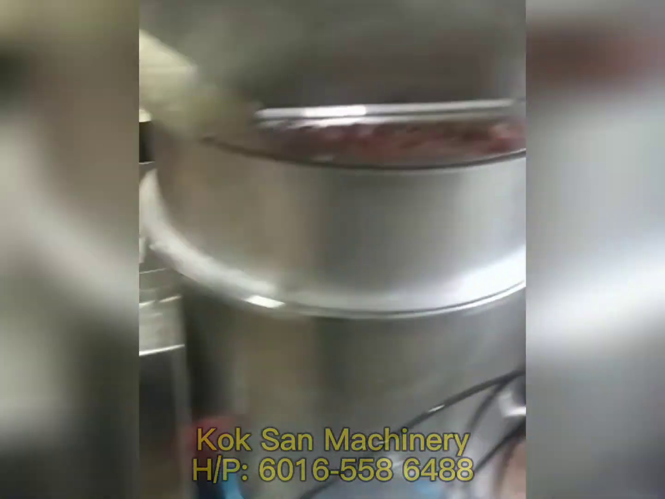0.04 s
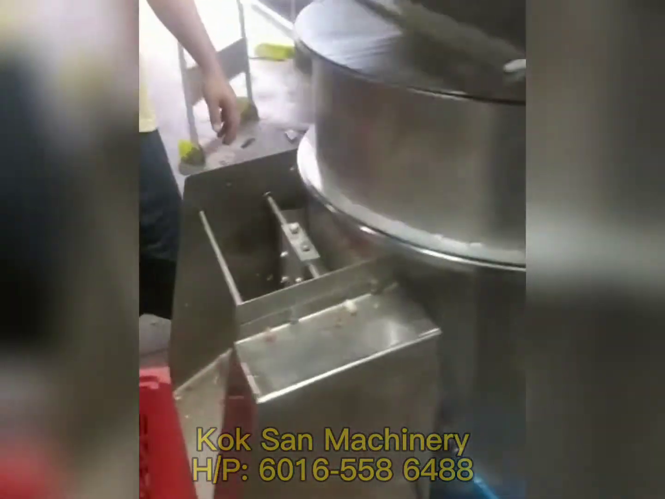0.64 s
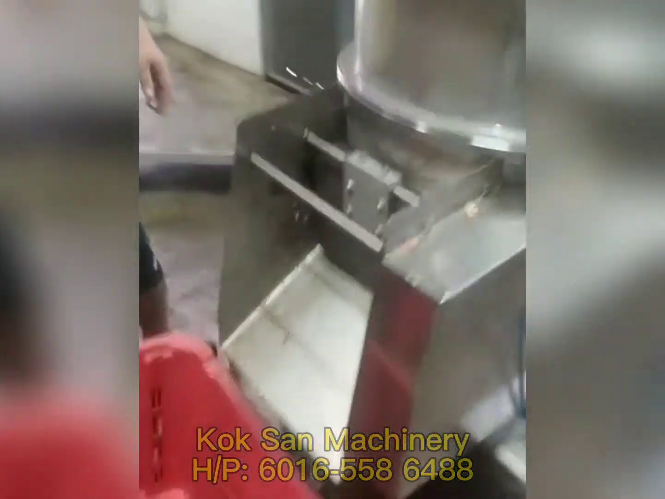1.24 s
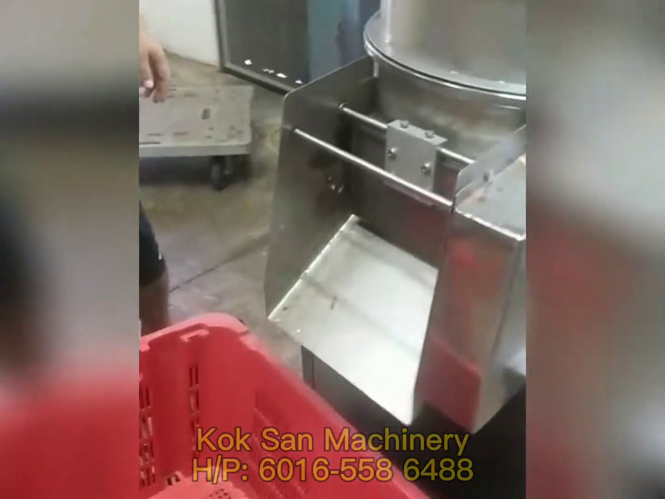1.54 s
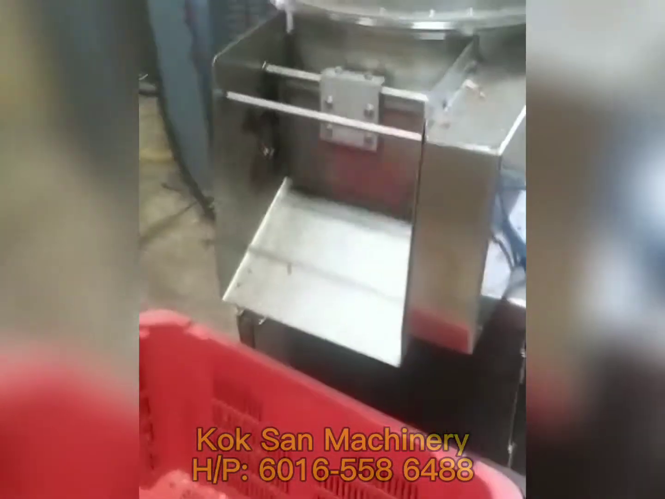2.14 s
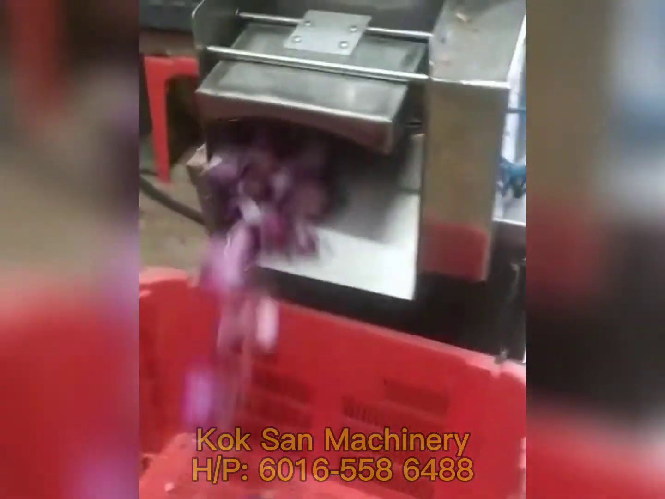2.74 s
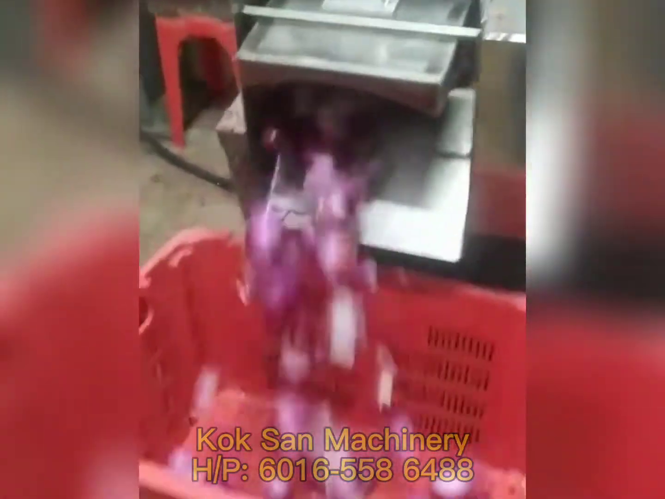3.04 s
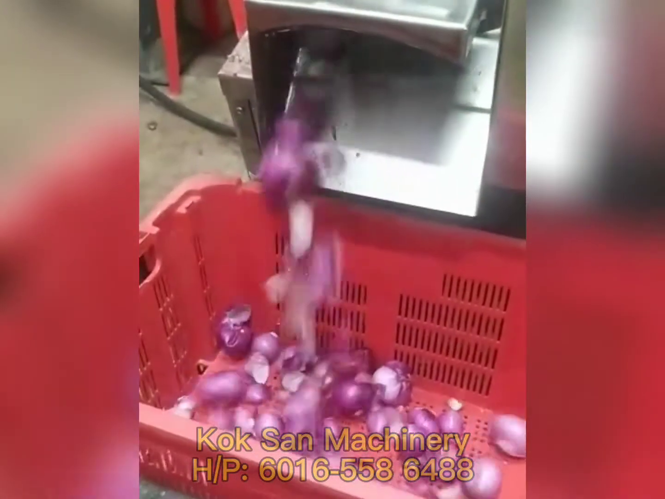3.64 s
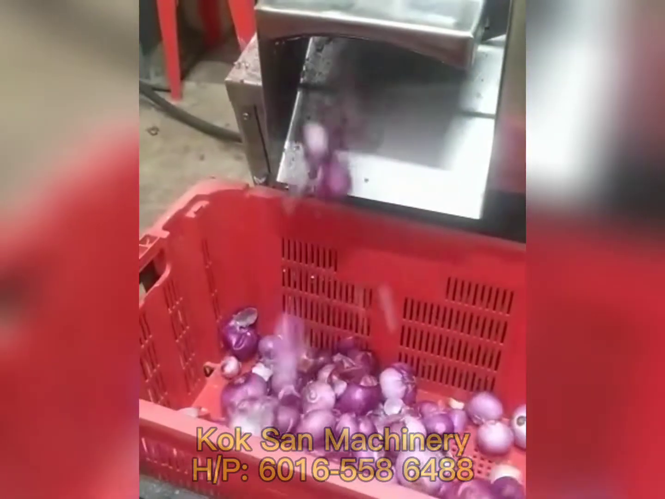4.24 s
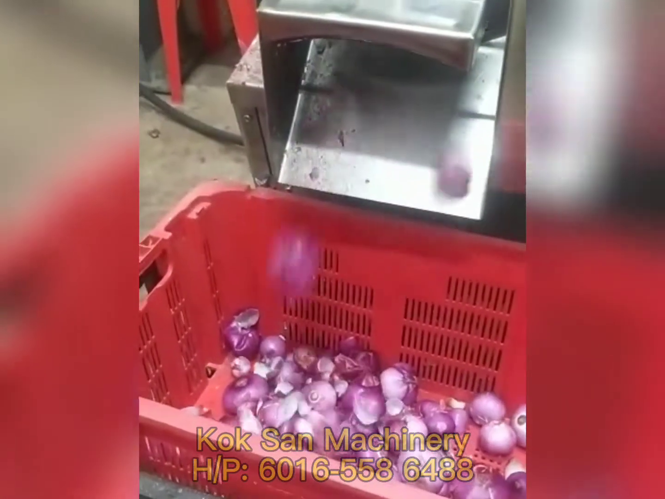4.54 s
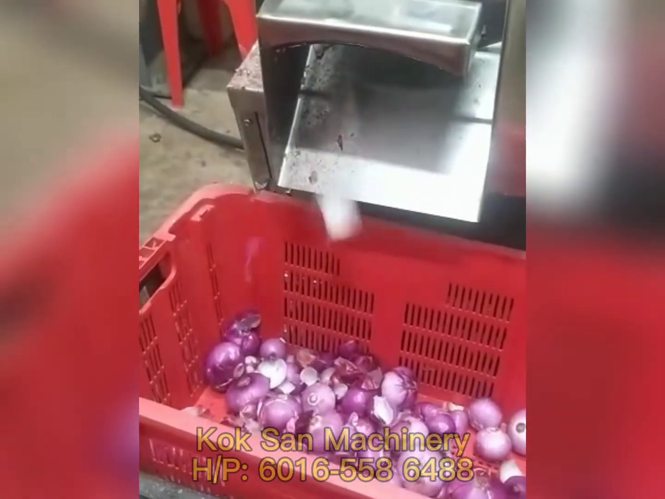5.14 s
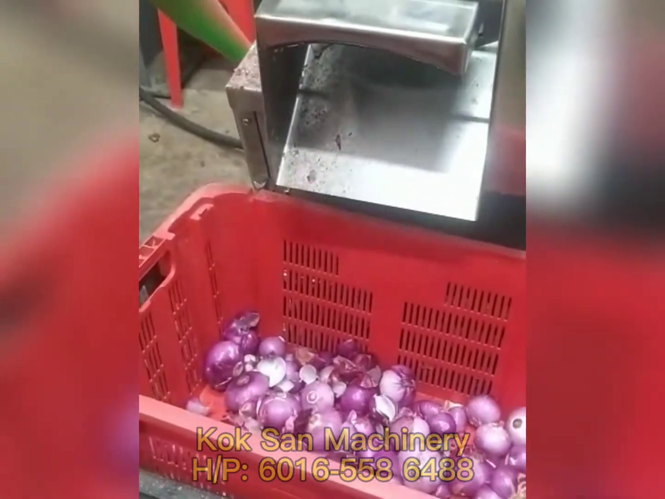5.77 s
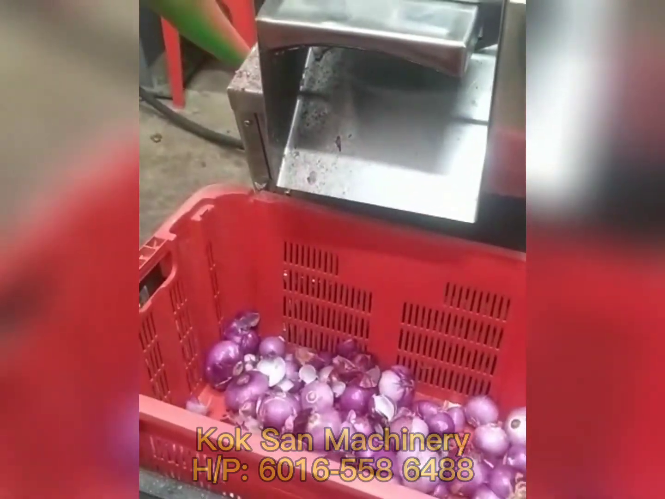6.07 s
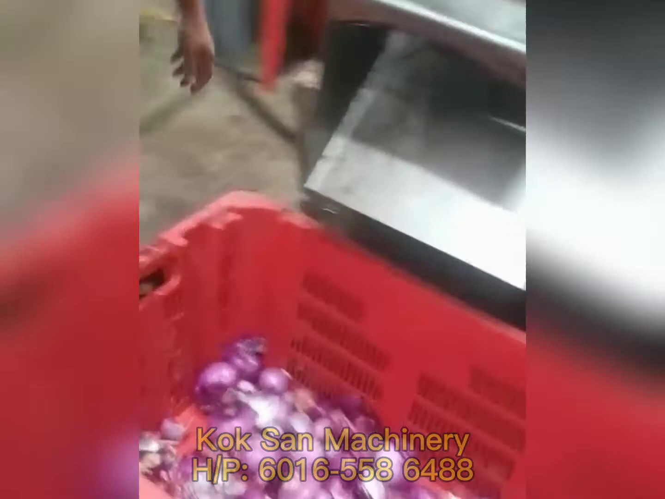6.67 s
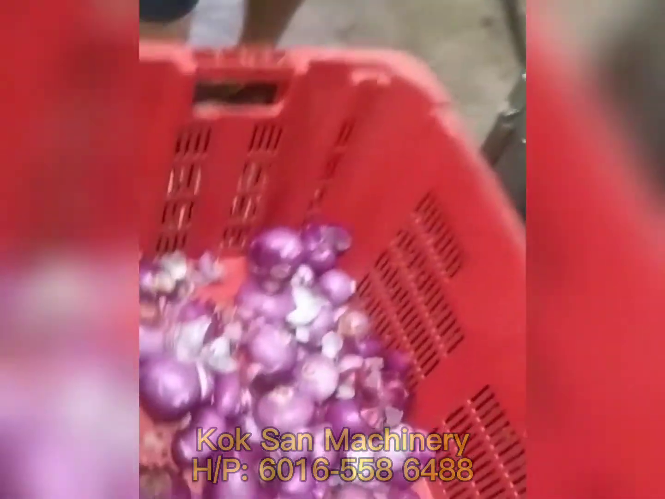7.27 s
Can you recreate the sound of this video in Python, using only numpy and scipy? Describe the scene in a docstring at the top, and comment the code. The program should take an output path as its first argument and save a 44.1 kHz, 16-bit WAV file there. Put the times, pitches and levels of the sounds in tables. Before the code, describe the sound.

A loud rush of compressed air dies away, onions knock down a steel chute, and a valve vents a softer hiss over motor hum.

```python
"""A hard-walled workshop, the microphone above the open steel drum of an onion peeler.
Air jets roar in the drum while onions tumble on the spinning disc. The air shuts off, the outlet flap
clanks open and the onions knock down a steel chute into a plastic crate; the microphone comes down
beside it. Later a valve clunks and vents a softer hiss. The motor hums throughout."""
import sys
import numpy as np
from scipy import signal
from scipy.fft import rfft, irfft, next_fast_len
from scipy.io import wavfile
from scipy.ndimage import uniform_filter1d, map_coordinates

SR = 44100
rng = np.random.default_rng(int(sys.argv[2]) if len(sys.argv) > 2 else 0)


def to_wav(sig):
    """Store sig (one row per channel, or 1-D mono) as 16-bit WAV at the path in sys.argv[1].

    Samples outside -1..1 are clipped; the rate is SR.
    """
    pcm = np.clip(np.atleast_2d(sig), -1, 1) * 32767
    pcm = np.round(pcm).astype(np.int16)
    wavfile.write(sys.argv[1], SR, pcm.T)  # frames by channels


N = 326781
T = np.arange(N) / SR

# Levels in the tables are relative; each source sets its own gain.
# Loudness over time: time_s, level_db
JET_LEVEL = [(0, -22.5), (.19, -24.5), (.45, -22.5), (1.0, -23.5), (1.35, -25), (1.59, -24.5),
             (1.78, -25.5), (1.9, -22.5), (2.02, -23.5), (2.08, -23.5)]  # the jets while their air is on
RUMBLE_LEVEL = [(0, -48), (.35, -48.5), (1.3, -51), (1.95, -47), (2.3, -51.5), (3.2, -54.5), (4.3, -47.5),
                (4.75, -51), (5.1, -57), (5.7, -59), (6.3, -55), (7.1, -54)]  # tumbling and drive
BOOM_LEVEL = [(0, -11), (.45, -4.5), (1.4, -2.5), (2.1, -2.5), (2.9, -2), (3.45, 0.5), (4.0, -5),
              (4.25, -1), (4.6, -7)]  # the drum's boom against its rumble
ROLL_LEVEL = [(.3, -31), (1.95, -37.5), (2.08, -29), (2.19, -38.5), (2.66, -42.5), (3.05, -56), (3.2, -49),
              (3.65, -64), (3.99, -42), (4.2, -49.5), (4.45, -51), (4.8, -39.5), (5, -46)]  # onions rolling on steel
# The drum's boom rises as it empties: time_s, pitch_hz
BOOM_PITCH = [(0, 228), (1.5, 242.6), (2.2, 258.6), (3.45, 275.7), (4.3, 285)]
# Motor speed: time_s, shaft_hz
SHAFT_SPEED = [(0, 39.75), (4.6, 39.65), (5.3, 39.35), (6, 38.9), (7.41, 39)]
# Motor hum: shaft_multiple, level_db
HUM_LINES = [(1, 0), (3, 2), (15, -1)]
# Drone that joins as the valve switches: pitch_hz, level_db
DRONE_LINES = [(100, -58), (159, -61), (204, -64), (279, -60), (372, -64.5)]

# Blows on steel, edge being the bright part: start_s, rise_s, thud_db, ring_db, edge_db, pitch_hz
FLAP_CLANKS = [(2.379, 0.0047, -44, -30.5, -31.5, 1375), (2.428, 0.0027, -53, -25.5, -22, 1240),
               (2.44, 0.0047, -46, -33, -36, 1290), (2.456, 0.0071, -47, -35, -30.5, 1400),
               (2.467, 0.0032, -47, -30, -41, 1310), (2.495, 0.0028, -54, -40, -48, 1080)]
VALVE_CLUNKS = [(6.128, 0.0097, -44.5, -55, -40, 700), (6.153, 0.0024, -33.5, -41, -38, 900),
                (6.175, 0.0042, -65, -59, -35, 3820), (6.995, 0.02, -43.5, -44, -43, 697),
                (7.06, 0.014, -43.5, -49, -37, 3770)]
START, RISE, THUD, RING, EDGE, PITCH = range(6)
# Onions hitting chute and crate: start_s, contact_s, knock_db, skin_db, pitch_hz
ONION_HITS = [(2.597, 0.0075, -33.5, -35.5, 1320), (2.622, 0.0051, -38.5, -41, 1240),
              (2.718, 0.016, -34, -35, 1340), (2.845, 0.0078, -38.5, -42, 1100),
              (2.897, 0.0069, -37.5, -34, 1000), (2.926, 0.002, -35.5, -38, 1290),
              (2.947, 0.0063, -39, -34.5, 1190), (2.975, 0.0094, -39, -38.5, 1190),
              (3.023, 0.0026, -39.5, -56, 1310), (3.132, 0.002, -37.5, -45, 1310),
              (3.15, 0.019, -42.5, -41.5, 1090), (3.335, 0.013, -41.5, -40.5, 935),
              (3.365, 0.016, -37, -36.5, 1300), (3.461, 0.0016, -54, -66, 840),
              (3.593, 0.0035, -52, -41, 1390), (3.605, 0.0073, -36, -32, 1405),
              (3.635, .01, -44, -49, 1430), (3.666, 0.0071, -36, -40.5, 1340),
              (3.81, 0.011, -36.5, -44, 920), (3.86, 0.0033, -36, -35, 1380),
              (3.875, 0.016, -43, -33, 1360), (3.908, 0.0048, -36.5, -37, 1110),
              (3.924, 0.0031, -30, -31.5, 1470), (4.028, 0.014, -34, -35, 1390),
              (4.303, 0.002, -36.5, -37, 1460), (4.316, 0.0047, -38, -33, 1350),
              (4.345, .006, -43, -47, 1460), (4.404, 0.0066, -37.5, -38.5, 1400),
              (4.524, 0.0064, -38, -37.5, 1250), (4.589, 0.0095, -20.5, -19, 1210),
              (4.606, 0.01, -29.5, -25.5, 1410), (4.632, 0.0011, -29, -38, 1510),
              (4.676, 0.007, -32.5, -24.5, 1420), (4.76, 0.0048, -28.5, -25.5, 1340),
              (4.777, 0.0088, -35.5, -37.5, 1580), (4.971, 0.0019, -36.5, -45, 1495)]
# Single contacts: start_s, level_db, pitch_hz
CRATE_KNOCKS = [(2.623, -24.5, 676), (2.732, -26, 650), (2.741, -26.5, 697), (2.927, -25, 820),
                (3.024, -28, 1290), (3.133, -31, 1240), (3.238, -33, 660), (3.381, -28.5, 860),
                (3.462, -31, 840), (4.163, -27.5, 490), (4.2, -31, 1220)]  # onions on bare plastic
STALK_TICKS = [(2.947, -19.5, 4700), (3.931, -19, 5440), (4.168, -46, 5500), (4.409, -28, 5520),
               (4.526, -21.5, 5500)]  # stalk ends on steel
FRAME_BUMPS = [(4.972, -34, 264), (6.147, -24, 165), (6.151, -25.5, 280), (6.154, -37, 810),
               (7.006, -26, 486)]  # dull bumps of the frame
SPOOL_SLAM = [(6.154, -33.5, 1635)]  # the valve's spool hits its seat
# Modes that those contacts ring: pitch_multiple, t60_s, level_db
CRATE_PARTIALS = [(.68, .03, -10), (1, .028, 0), (1.35, .022, -4), (1.85, 0.017, -3), (2.9, 0.011, -13)]
TICK_PARTIALS = [(.55, .008, -14), (1, 0.028, -6), (1.07, 0.014, -13), (1.6, .008, -12), (2.1, .008, -16)]
BUMP_PARTIALS = [(1, 0.033, -0.5), (1.4, 0.038, -4), (1.95, .05, -8.5)]
SLAM_PARTIALS = [(.4, 0.073, -4), (1, 0.1, 1), (1.58, .22, -5), (1.79, .12, -4), (2.18, .18, -6),
                 (2.49, .17, -2), (3.26, .15, -10)]
# Modes of the chute: pitch_hz, t60_s, level_db
CHUTE_FLEX = [(91, 0.12, -5), (111.6, 0.17, 3.5), (252, .09, -13), (400, 0.092, -11)]  # the whole chute under a heavy onion
CHUTE_SHEET = [(1096, .17, -3), (1217, .16, -3), (1420, 0.14, -9), (1443, 0.16, 0), (1640, 0.2, -2),
               (1704, .2, -10), (2000, 0.17, -6), (2390, .14, -6), (2510, 0.32, -4.5), (2890, 0.16, -5),
               (3260, .18, -9), (3720, .18, -11)]  # its thin sheet

# Resonances of cavities and steel parts: centre_hz, width_hz, level_db
DRUM_CAVITY = [(421.4, 23, -7.5), (514, 25, -6.5), (737, 19, -3.5), (1180, 71, 1.5), (2380, 93, 1)]
FRAME_BODY = [(98, 12, -5), (119, 15, 2), (263, 66, -2), (379.4, 41, 4.5), (482, 31, -2.5),
              (581.6, 11.7, 4.5), (684, 32, 2), (903, 53, -5)]
FLAP_BODY = [(1065, 87, -5.5), (1243, 29, 4), (1433, 37, -3.5), (1730, 56, -2), (1955, 44, 1),
             (2140, 87, -3), (2410, 100, -7), (3060, 57, -6)]
FLAP_EDGE = [(4580, 200, -1), (5450, 70, 1), (6300, 60, -4)]
CHUTE_BODY = [(1058, 66, 0.5), (1227, 60, -7), (1440, 63, 5), (2055, 92, 1), (2506, 95, -3.5),
              (3070, 110, -13)]
CHUTE_EDGE = [(2500, 180, 0), (5000, 100, 3), (5600, 720, -1)]
EXHAUST_PORT = [(2830, 40, -1), (3340, 24, 1), (4100, 130, 0), (4400, 69, -1), (4850, 52, 2),
                (5300, 22, -1)]

# Noise spectra at the microphone: frequency_hz, density_db
JET_SPECTRUM = [(300, -28.5), (480, -42), (720, -8), (850, -35), (1040, -2.5), (1250, -24), (1420, -12.5),
                (1750, -2), (2400, -1), (3900, -0.9), (5800, 0.8), (7800, -6), (10000, -4), (13000, 1.5),
                (15600, -3)]
RUMBLE_SPECTRUM = [(35, -30), (60, -18), (100, 0.5), (130, 1), (170, -1), (220, 1.5), (310, -2),
                   (400, -8.5), (600, -9), (1300, -57)]
BEAT_SPECTRUM = [(15, 1), (30, -4), (65, -17), (200, -60), (400, -120)]  # the boom's uneven beating
ROLL_SPECTRUM = [(250, -43), (450, -9), (700, -5.5), (900, -3), (1350, 1), (1800, -7.5), (2600, -3),
                 (3600, -5.5), (5600, -6.5), (8000, -15.5), (15000, -15)]
WHIRR_SPECTRUM = [(200, -46), (400, -13), (560, -7.5), (900, -6.5), (1200, 1), (1800, -0.5), (2600, -3),
                  (3700, -7), (5800, -11.5), (7600, -20.5), (10000, -19.5), (13000, -17.5), (16000, -22)]  # the workshop's background
SCUFF_SPECTRUM = [(1760, -23), (3000, -3), (3360, -3), (4410, -4), (5630, -2.5), (7000, -6.5), (9330, -11),
                  (13300, -4.5), (14900, -13), (15700, -12), (16000, -29)]  # onion skins, and the flap's crash
KNOCK_SPECTRUM = [(500, -53), (800, -15), (1100, 5), (1600, 3.5), (2400, 5.5), (3400, -17), (5000, -21)]  # a dull knock on sheet steel
CHURN_SPECTRUM = [(100, -17), (400, -7), (800, 4.5), (1500, -3.5), (3500, -11), (8000, -30)]
CLICK_SPECTRUM = [(1200, -13), (2600, 3.5), (4000, -5), (5500, -1), (8000, -16), (15000, -20)]
HISS_SPECTRUM = [(250, -27), (450, -30), (760, -16), (1400, -11.5), (2000, -3), (3000, -4.5), (4000, 0.5),
                 (5500, -0.5), (7600, -12), (9000, -13.5), (12000, -19)]
FIZZ_SPECTRUM = [(5000, -35), (8000, -12), (10300, -5), (11800, 1.5), (13500, -2), (15600, -7)]
# The workshop's echo: frequency_hz, t60_s
ROOM_DECAY = [(100, 1), (500, 0.69), (2000, 0.31), (6000, 0.23), (14000, 0.16)]
# Stereo width: frequency_hz, side_minus_mid_db
STEREO_WIDTH = [(60, -7), (200, -16.5), (380, -7.5), (700, -5), (1000, -2), (1300, 3.5), (2400, -0.5),
                (15000, 0.5)]

JET_SHUT_S = 2.107
HOLLOW_FADE_DB_PER_S = 2  # the microphone moves away from the drum's open top
WALL_DRIFT_S = .0005  # the panels' echoes shift as the microphone is carried along
STOOP_S, STOOP_LENGTH_S = 3.38, 0.68  # the microphone comes down to the crate
HUM_NEAR_DB, HUM_FAR_DB = -63, -81  # beside the crate, and from above the drum
# An onion's thud, chute flex and sheet ring: level at a 0 dB knock, dB per dB of knock
THUD_DB, THUD_FOLLOWS = -22, 0.71
FLEX_DB, FLEX_FOLLOWS = 32, 2.87
SHEET_DB, SHEET_FOLLOWS = 3, 1.42
THUD_NEAR_DB = 5  # extra thud with the microphone beside the crate
SHEET_DETUNE, SHEET_SCATTER_DB = 0.0092, 3  # the onions' weight shifts modes; each spot favours its own
UPPER_SPAN_HZ, UPPER_T60_S, UPPER_DB = (1200, 6900), 0.17, -15.5  # upper modes, against the skin rustle
STRAY_SPAN_S, STRAY_DB, STRAY_SPREAD_DB = (3.2, 4.1), -47.5, -6  # light bumps between the loud ones
STRAY_CONTACT_S, STRAY_SKIN_DB, STRAY_HZ = 0.0025, -5.5, 1290  # skin level is against the knock
VENT_OPEN_S, VENT_ATTACK_S, VENT_SHUT_S = 6.147, 0.018, 6.695
HISS_DB, FIZZ_DB, SWELL_DB_PER_S = -38.5, -40, 2.5  # the held hiss grows a little
SPURT_DB, SPURT_S = 8, 0.044  # pent-up pressure leaves first
PINCH_DB, PINCH_S = 1, 0.055  # a swell just before the vent closes
PORT_DB, SPUTTER_DB = -7.5, 4  # the exhaust port against the hiss, and how much it sputters
TOP_HZ = 15650


def amp(db):
    """Decibels to gain."""
    return 10 ** (np.asarray(db) / 20)


def unit(x):
    """Scale to rms 1."""
    return x / np.sqrt(np.mean(np.abs(x) ** 2) + 1e-20)


def along(points, hz):
    """Read (frequency_hz, value) points on a log axis."""
    knots_hz, values = np.transpose(points)
    return np.interp(np.log(hz + 1), np.log(knots_hz + 1), values)


def curve(points):
    """Read (time_s, value) points at every sample."""
    return np.interp(T, *np.transpose(points))


def wobble(rate):
    """A smooth random curve, rate knots a second."""
    return map_coordinates(rng.standard_normal(int(N * rate / SR) + 4), [T * rate])


def filtered(x, response):
    """Pass x through a complex response of frequency."""
    size = next_fast_len(N + SR // 2)
    return irfft(rfft(x, size) * response(np.fft.rfftfreq(size, 1 / SR)), size)[..., :N]


def coloured(x, spectrum):
    """Give x a spectrum, keeping the power of white noise."""
    return filtered(x, lambda hz: unit(amp(along(spectrum, hz))))


def resonate(x, modes):
    """Ring x through resonances of alternating sign, keeping the power of white noise."""
    def response(hz):
        return unit(sum((-1) ** k * amp(db) * 1j * hz * width / (centre ** 2 - hz ** 2 + 1j * hz * width)
                        for k, (centre, width, db) in enumerate(modes)))
    return filtered(x, response)


def turbulence(patchy_db):
    """Two white noises (mid, side) with drifting patches of gain."""
    bins = signal.stft(rng.standard_normal((2, N)), nperseg=1024)[2]
    patches = uniform_filter1d(rng.standard_normal(bins.shape), 4, axis=1)
    patches = unit(uniform_filter1d(patches, 16, axis=2))
    return unit(signal.istft(bins * amp(patchy_db * patches), nperseg=1024)[1][:, :N])


def add_at(track, start_s, sound):
    """Mix a sound into a track, cut off at the track's end."""
    span = track[..., round(start_s * SR):][..., :sound.shape[-1]]
    span += sound[..., :span.shape[-1]]


def bleed(shut_s, drop_db_per_s, rest_db, rest_db_per_s):
    """Level in dB after a valve shuts: pressure drops fast, then the air left in the line drains."""
    since = np.maximum(T - shut_s, 0)
    drop = (1 - amp(rest_db)) * amp(-drop_db_per_s * since)
    drain = amp(rest_db - rest_db_per_s * since)
    return 20 * np.log10(drop + drain + 1e-12)


def passing_walls(x, echo_db, count):
    """Early echoes shift as the microphone moves, so their ripple wanders through the spectrum."""
    out = x.copy()
    for delay_s in rng.uniform(.001, .007, count):
        lag = np.rint(SR * (delay_s + WALL_DRIFT_S * wobble(1.4))).astype(int)
        out += amp(echo_db) * np.take(x, np.arange(N) - lag, axis=1, mode="wrap")
    return unit(out)


def wall_pings(count, t60, span_s):
    """Onions flung against the drum wall set off many brief rings of scattered pitch and size."""
    t = T[:SR // 14]
    when, pitch, size, bearing = rng.random((count, 4)).T[..., None]
    hz = 1450 * 4.3 ** pitch
    shape = (1 - np.exp(-t / 0.00076)) * amp(-60 * t / t60)
    rings = (1.4 + size ** 3) * shape * np.sin(2 * np.pi * hz * t)
    index = (when * span_s * SR).astype(int) + np.arange(len(t))
    mid, side = [np.bincount(index.ravel(), (rings * pan(2 * np.pi * bearing)).ravel(), N)
                 for pan in (np.cos, np.sin)]
    return np.array([mid, side]) / np.std(mid[:2 * SR])


def jets():
    """Compressed air roars in the hollow, pinging drum below the microphone and dulls as it dies."""
    fall_db = bleed(JET_SHUT_S, drop_db_per_s=230, rest_db=-13.5, rest_db_per_s=20.5)
    flutter_db = .6 * wobble(35)
    air = coloured(passing_walls(turbulence(patchy_db=1.4), echo_db=-17, count=5), JET_SPECTRUM)
    treble = filtered(air, lambda hz: 1 / (1 + (6500 / (hz + 1)) ** 4))
    air -= np.clip(-fall_db / 14, 0, .5) * treble
    hollow = resonate(turbulence(patchy_db=1.5), DRUM_CAVITY)
    hollow *= amp(-HOLLOW_FADE_DB_PER_S * np.minimum(T, JET_SHUT_S))
    pings = wall_pings(count=800, t60=.08, span_s=2.4)
    roar = amp(2.3) * air + amp(-13) * hollow + amp(-7) * pings
    return amp(curve(JET_LEVEL) + fall_db + flutter_db) * roar


def drum():
    """The disc rumbles, and the onions boom and rattle round the steel wall until the drum is empty."""
    loaded = np.clip((5.3 - T) / 0.62, 0, 1)  # empty at 5.3 s
    rumble = amp(-1.5 + 3.6 * (1 - loaded)) * coloured(turbulence(patchy_db=1.5), RUMBLE_SPECTRUM)
    beats = coloured(turbulence(patchy_db=1.2), BEAT_SPECTRUM)
    note = np.sin(2 * np.pi * np.cumsum(curve(BOOM_PITCH)) / SR)
    boom = loaded * amp(curve(BOOM_LEVEL)) * unit(beats * note)
    rolling = coloured(turbulence(patchy_db=2), ROLL_SPECTRUM)
    rattle = loaded * amp(curve(ROLL_LEVEL) + 2.24 * wobble(70)) * rolling
    return amp(curve(RUMBLE_LEVEL) + wobble(16)) * (rumble + boom) + rattle


def nearness():
    """Microphone position: 0 above the drum, 1 down by the crate."""
    return np.clip((T - STOOP_S) / STOOP_LENGTH_S, 0, 1)


def tone(hz, db, waver_db):
    """A slightly unsteady line, dead centre."""
    phase = 2 * np.pi * np.cumsum(np.broadcast_to(hz, N)) / SR + hz / 600 * wobble(12)
    return amp(db + waver_db * wobble(3.064)) * np.sin(phase) * np.array([[1], [0]])


def motor():
    """The motor hums over the workshop's whirr, louder by the crate; a drone joins with the valve."""
    hum_db = HUM_FAR_DB + (HUM_NEAR_DB - HUM_FAR_DB) * nearness()
    shaft_hz = curve(SHAFT_SPEED)
    hum = sum(tone(multiple * shaft_hz, hum_db + db, waver_db=4.5) for multiple, db in HUM_LINES)
    whirr = amp(-52) * coloured(turbulence(patchy_db=1), WHIRR_SPECTRUM)
    switched = np.clip((T - 6.07) / 0.031, 0, 1)
    drone = sum(tone(hz, db - 0.5, waver_db=4) for hz, db in DRONE_LINES)
    churn = amp(-49) * coloured(turbulence(patchy_db=1.5), CHURN_SPECTRUM)
    return hum + whirr + switched * (drone + churn)


def blows(rows, column, t60, grit_db, pitch_db):
    """Gritty bursts swell over each contact and die; t60 is for a 5.5 ms rise, briefer dies faster."""
    out, t = np.zeros((2, N)), T[:SR // 2]
    grit = unit(rng.standard_normal((2, N)) * amp(grit_db * wobble(900)))
    for row in rows:
        rise = max(row[RISE], .001)
        life = t60 * np.sqrt(rise / 0.0055)
        shape = np.minimum(t / rise, 1) * amp(-60 * np.maximum(t - rise, 0) / life)
        burst = shape * np.take(grit, round(row[START] * SR) + np.arange(len(t)), axis=1, mode="wrap")
        # the struck spot favours its own pitch
        spot = signal.lfilter(*signal.iirpeak(row[PITCH], Q=4, fs=SR), burst)
        add_at(out, row[START], amp(row[column]) * (burst + amp(pitch_db) * spot))
    return out


def thump(x):
    """The machine's frame answers a blow; it radiates no deep bass."""
    low_cut = signal.butter(6, 78, "high", fs=SR, output="sos")
    return signal.sosfilt(low_cut, resonate(x, FRAME_BODY))


def tocks(rows, t60):
    """A firm contact rings a few close panel modes and a high ping; slow, glancing ones hardly do."""
    out, t = np.zeros((2, N)), T[:SR // 4]
    shape = (1 - np.exp(-t / 0.00077)) * amp(-60 * t / t60)
    for row, chance in zip(rows, rng.standard_normal((len(rows), 2, 4, 1))):
        hz = np.array([[0.67 * row[PITCH]], [row[PITCH]], [row[PITCH]], [5450]]) * (1 + 0.031 * chance)
        levels = amp([[row[RING] - 8], [row[RING]], [row[RING] - 7], [row[EDGE] - 5]])
        ring = np.sum(levels * np.sin(2 * np.pi * hz * t), axis=1)
        firmness = min(1, 0.0038 / max(row[RISE], .001))
        add_at(out, row[START], firmness * shape * ring)
    return out


def room(x, wet_db):
    """The workshop's hard walls echo 5 ms behind the direct sound; the treble dies first."""
    hz, t, bins = signal.stft(rng.standard_normal((2, SR)), SR, nperseg=256)
    decay = amp(-60 * t / along(ROOM_DECAY, hz)[:, None])
    tail = signal.istft(bins * decay, SR, nperseg=256)[1]
    tail = np.pad(tail / np.linalg.norm(tail[0]), ((0, 0), (SR // 200, 0)))
    return x + amp(wet_db) * signal.fftconvolve(x, tail, axes=1)[:, :N]


def flap():
    """The steel flap is thrown open and rattles against its stop; its edge rings brightly."""
    thud = thump(blows(FLAP_CLANKS, THUD, t60=.08, grit_db=2.5, pitch_db=-20))
    ring = resonate(blows(FLAP_CLANKS, RING, t60=0.18, grit_db=3.5, pitch_db=-9), FLAP_BODY)
    crash = coloured(blows(FLAP_CLANKS, EDGE, t60=0.16, grit_db=-1.5, pitch_db=-20), SCUFF_SPECTRUM)
    bright = resonate(blows(FLAP_CLANKS, EDGE, t60=0.11, grit_db=8.5, pitch_db=-22), FLAP_EDGE)
    firm = tocks(FLAP_CLANKS, t60=0.054)
    clank = amp(2.5) * (thud + firm) + amp(0.5) * ring + amp(-0.5) * crash + amp(-2) * bright
    return room(clank, wet_db=-12)


def strays(count):
    """Light bumps scattered through the pour, as rows like those of ONION_HITS."""
    when, size, pitch = rng.random((count, 3)).T
    first, last = STRAY_SPAN_S
    start_s = first + (last - first) * (np.arange(count) + when) / count
    knock_db = STRAY_DB + STRAY_SPREAD_DB * (2 * size - 1)
    hz = STRAY_HZ * 2 ** (pitch - .5)
    return np.transpose([start_s, np.full(count, STRAY_CONTACT_S), knock_db, knock_db + STRAY_SKIN_DB, hz])


def pour():
    """Onion contacts as rows like those of FLAP_CLANKS: harder and nearer knocks thump more."""
    start_s, contact_s, knock_db, skin_db, hz = np.vstack([ONION_HITS, strays(count=11)]).T
    thud_db = THUD_DB + THUD_FOLLOWS * knock_db + THUD_NEAR_DB * np.interp(start_s, T, nearness())
    return np.transpose([start_s, contact_s, thud_db, knock_db, skin_db, hz])


def near_panels(x, echo_db):
    """Steel panels near the microphone add weak early copies, which ripple the spectrum."""
    delays_s = rng.uniform(.002, .02, (8, 2, 1))
    return filtered(x, lambda hz: unit(1 + amp(echo_db) * sum(np.exp(-2j * np.pi * hz * delay)
                                                              for delay in delays_s)))


def chute_flex(hits):
    """Heavy onions flex the whole chute, which booms; light ones hardly move it."""
    out, t = np.zeros((2, N)), T[:SR // 2]
    modes = sum(amp(db - 60 * t / t60) * np.sin(2 * np.pi * hz * t) for hz, t60, db in CHUTE_FLEX)
    boom = (1 - np.exp(-t / 0.016)) ** 2 * modes
    for row in hits:
        add_at(out[0], row[START], amp(FLEX_DB + FLEX_FOLLOWS * row[RING]) * boom)
    return out


def sheet_ring(hits):
    """The chute's thin sheet sings on after a blow, differently each time and mostly after heavy ones."""
    out, t = np.zeros((2, N)), T[:SR // 4]
    hz, t60, db = np.transpose(CHUTE_SHEET)[..., None]
    fade = amp(db - 60 * t / t60) * (1 - np.exp(-t / 0.0051))
    chance = rng.standard_normal((len(hits), 2, len(hz), 1))
    for row, phase, (shift, favour) in zip(hits, rng.random((len(hits), 2, len(hz))), chance):
        shifted_hz = hz * (1 + SHEET_DETUNE * shift)
        modes = fade * amp(SHEET_SCATTER_DB * favour) * np.exp(2j * np.pi * shifted_hz * t)
        ring = np.real(np.exp(2j * np.pi * phase) @ modes)
        add_at(out, row[START], amp(SHEET_DB + SHEET_FOLLOWS * row[RING]) * ring)
    return out


def upper_modes(hits, count):
    """Every spot on a steel sheet picks its own handful out of the crowded upper modes."""
    out, t = np.zeros((2, N)), T[:SR // 6]
    low, high = UPPER_SPAN_HZ
    for row, (pitch, size, phase) in zip(hits, rng.random((len(hits), 3, 2, count, 1))):
        hz = low * (high / low) ** ((np.arange(count)[:, None] + pitch) / count)
        ring = np.sum(size * np.sin(2 * np.pi * (hz * t + phase)), axis=1)
        rise = max(row[RISE], .001)
        shape = np.minimum(t / rise, 1) * amp(-60 * np.maximum(t - rise, 0) / UPPER_T60_S)
        add_at(out, row[START], amp(UPPER_DB + row[EDGE]) * shape * ring)
    return out


def onions():
    """Each onion thumps the frame, knocks on the chute and scuffs it with its skin."""
    hits = pour()
    thud = thump(blows(hits, THUD, t60=0.16, grit_db=-1, pitch_db=-10))
    knock = coloured(blows(hits, RING, t60=0.09, grit_db=3, pitch_db=8.5), KNOCK_SPECTRUM)
    ring = resonate(blows(hits, RING, t60=0.16, grit_db=1.5, pitch_db=-15), CHUTE_BODY)
    scuffs = blows(hits, EDGE, t60=0.115, grit_db=1.5, pitch_db=-18)
    skin = coloured(near_panels(scuffs, echo_db=-13), SCUFF_SPECTRUM)
    bright = resonate(blows(hits, EDGE, t60=0.095, grit_db=-2, pitch_db=-20), CHUTE_EDGE)
    contact = thud + amp(-9.5) * knock + amp(3.5) * tocks(hits, t60=.05) + amp(-2) * skin
    steel = chute_flex(hits) + sheet_ring(hits) + upper_modes(hits, count=9)
    return room(contact + steel + amp(-6.5) * ring + amp(-5) * bright, wet_db=-9)


def landings():
    """Onions knock drily on the plastic crate, and hard stalk ends tick on the steel."""
    knocks = raps(CRATE_KNOCKS, CRATE_PARTIALS, attack_s=0.0017, detune=0.038)
    ticks = raps(STALK_TICKS, TICK_PARTIALS, attack_s=.0003, detune=0.029)
    return room(knocks + ticks, wet_db=-6.5)


def raps(rows, modes, attack_s, detune):
    """Single hard contacts, each setting off a few short modes around its own pitch."""
    out, t = np.zeros((2, N)), T[:SR // 4]
    ratio, t60, mode_db = np.transpose(modes)[..., None]
    for (start_s, db, hz), chance in zip(rows, rng.standard_normal((len(rows), 2, len(modes), 1))):
        ring = amp(mode_db - 60 * t / t60) * np.sin(2 * np.pi * hz * ratio * (1 + detune * chance) * t)
        add_at(out, start_s, amp(db) * (1 - np.exp(-t / attack_s)) * ring.sum(axis=1))
    return out


def valve():
    """The frame bumps, and the valve clunks as its spool hits the seat."""
    thud = thump(blows(VALVE_CLUNKS, THUD, t60=.14, grit_db=2, pitch_db=-12))
    knock = coloured(blows(VALVE_CLUNKS, RING, t60=0.15, grit_db=2, pitch_db=-7), KNOCK_SPECTRUM)
    click = coloured(blows(VALVE_CLUNKS, EDGE, t60=0.14, grit_db=2, pitch_db=5), CLICK_SPECTRUM)
    bump = raps(FRAME_BUMPS, BUMP_PARTIALS, attack_s=0.0049, detune=0.028)
    slam = raps(SPOOL_SLAM, SLAM_PARTIALS, attack_s=0.0017, detune=0.004)
    return room(bump + slam + amp(-3) * (thud + click) + amp(0.5) * knock, wet_db=-12.5)


def vent():
    """Air spurts from the exhaust port, holds and drains; its fizz fades first as the pressure falls."""
    since = np.maximum(T - VENT_OPEN_S, 0)
    pinch_db = PINCH_DB * np.exp(-((T - VENT_SHUT_S + PINCH_S) / PINCH_S) ** 2)
    flow = np.minimum(since / VENT_ATTACK_S, 1) * amp(SPURT_DB * np.exp(-since / SPURT_S) + pinch_db)
    swell_db = SWELL_DB_PER_S * (np.minimum(T, VENT_SHUT_S) - VENT_OPEN_S)
    hiss_db = HISS_DB + swell_db + bleed(VENT_SHUT_S, drop_db_per_s=150, rest_db=-4.5, rest_db_per_s=22.5)
    fizz_db = FIZZ_DB + bleed(VENT_SHUT_S, drop_db_per_s=150, rest_db=-13.5, rest_db_per_s=17)
    air = coloured(turbulence(patchy_db=1.5) * amp(.8 * wobble(150)), HISS_SPECTRUM)
    sputter = unit(turbulence(patchy_db=4) * amp(SPUTTER_DB * wobble(60)))
    hiss = amp(hiss_db) * (air + amp(PORT_DB) * resonate(sputter, EXHAUST_PORT))
    fizz = amp(fizz_db) * coloured(turbulence(patchy_db=2.5), FIZZ_SPECTRUM)
    return flow * (hiss + fizz)


def scene():
    """Mid and side at the microphone, turned to left and right: bass nearly mono, treble diffuse."""
    mid, side = jets() + drum() + flap() + onions() + landings() + vent() + valve() + motor()
    side = filtered(side, lambda hz: amp(along(STEREO_WIDTH, hz)))
    return np.array([mid + side, mid - side])


def record(dry):
    """The handheld recorder keeps nothing above its band limit."""
    return filtered(dry, lambda hz: hz < TOP_HZ)


dry = scene()
out = record(dry)
to_wav(out)
```